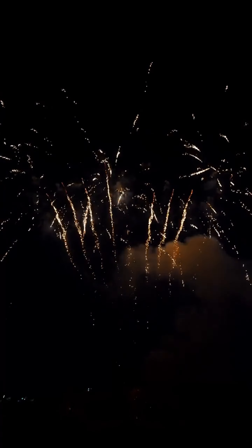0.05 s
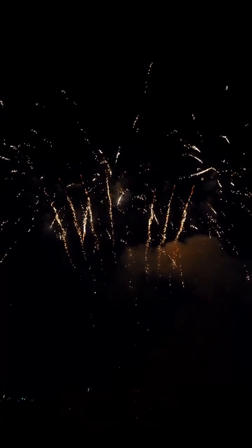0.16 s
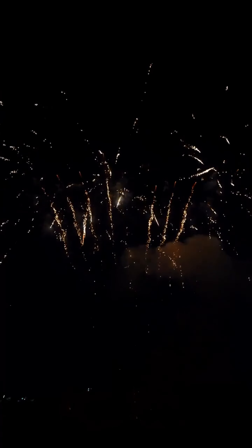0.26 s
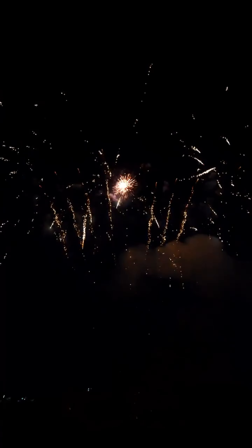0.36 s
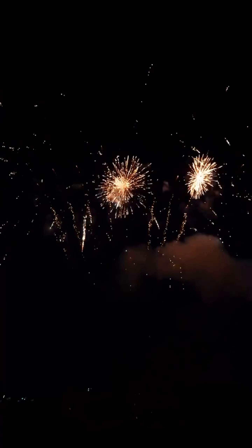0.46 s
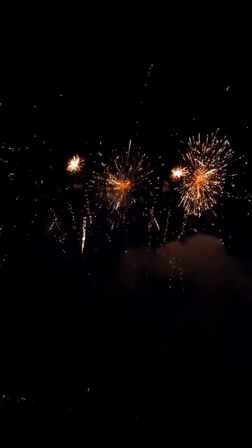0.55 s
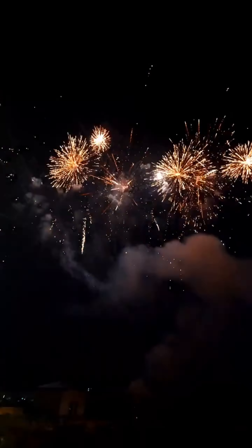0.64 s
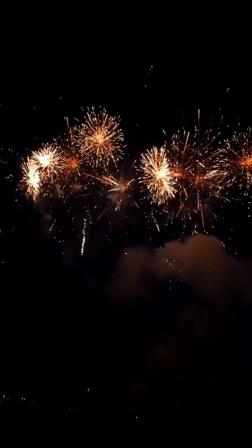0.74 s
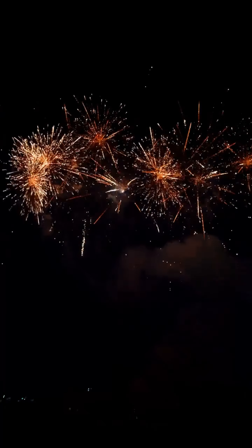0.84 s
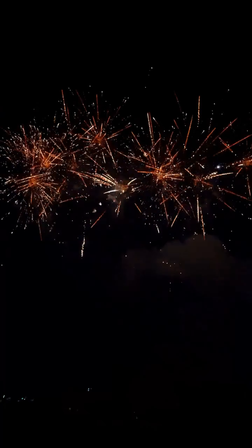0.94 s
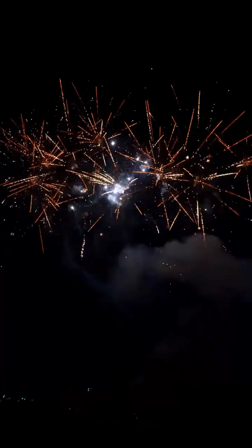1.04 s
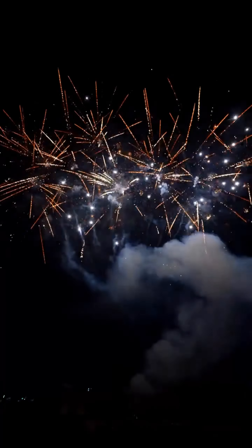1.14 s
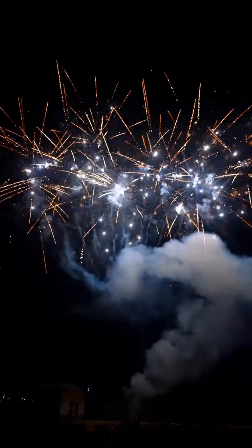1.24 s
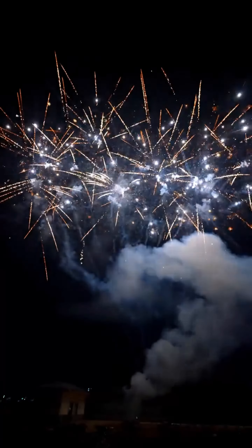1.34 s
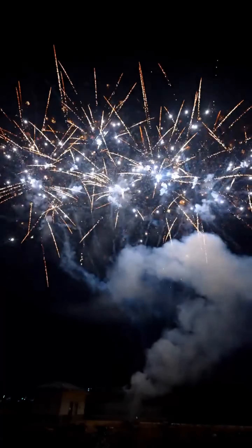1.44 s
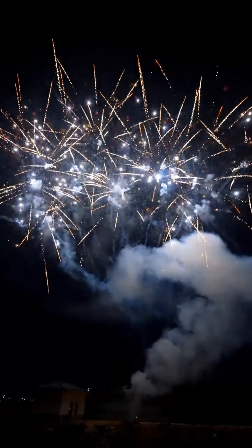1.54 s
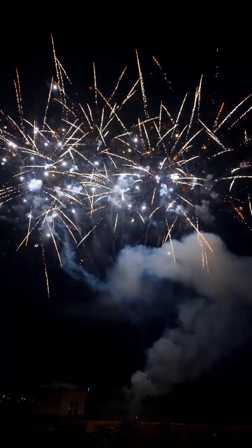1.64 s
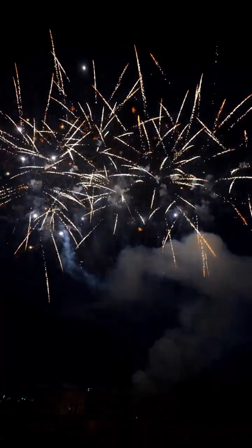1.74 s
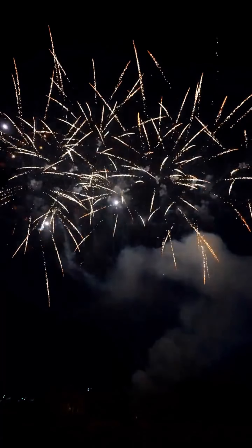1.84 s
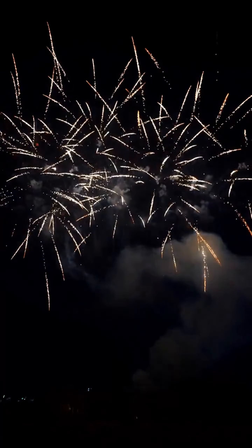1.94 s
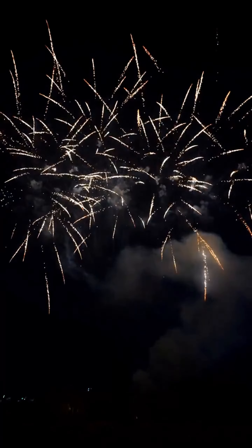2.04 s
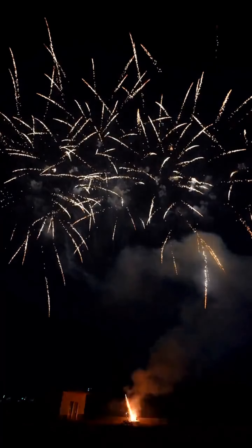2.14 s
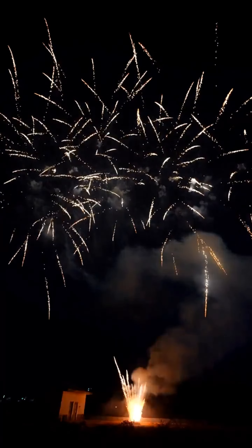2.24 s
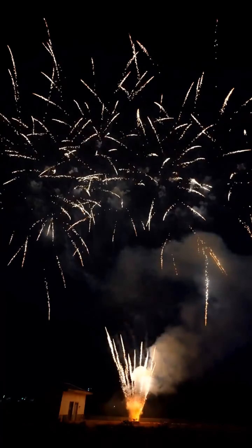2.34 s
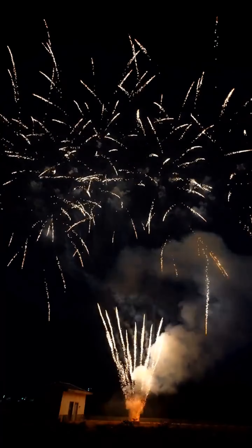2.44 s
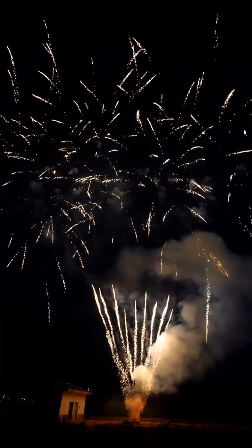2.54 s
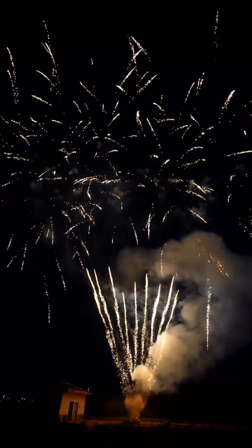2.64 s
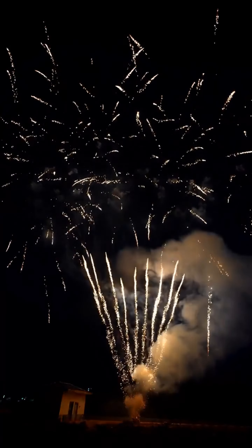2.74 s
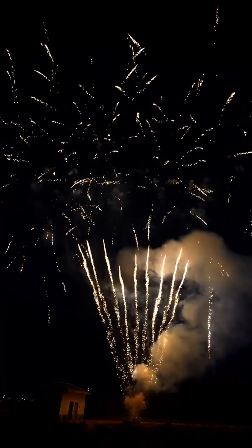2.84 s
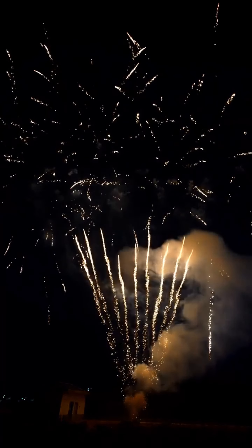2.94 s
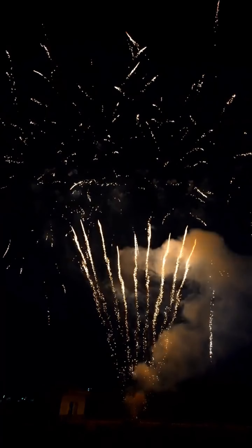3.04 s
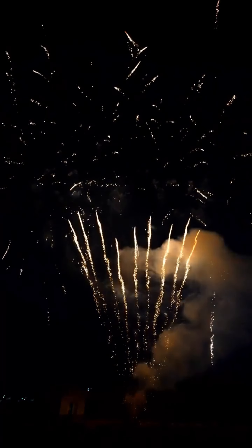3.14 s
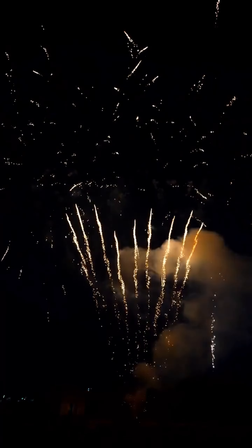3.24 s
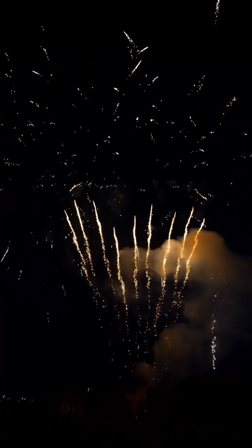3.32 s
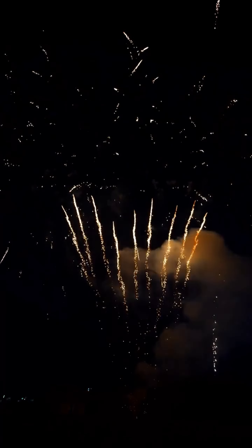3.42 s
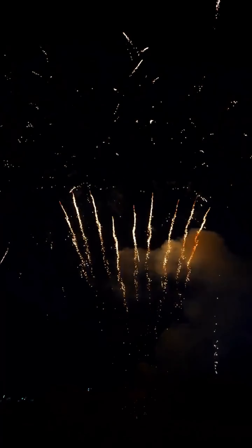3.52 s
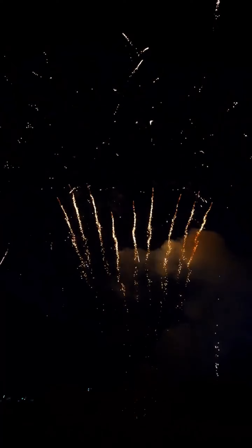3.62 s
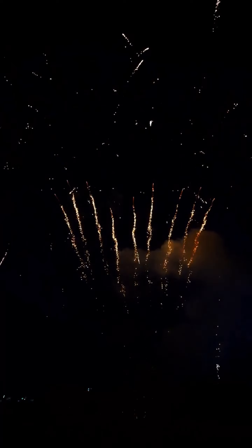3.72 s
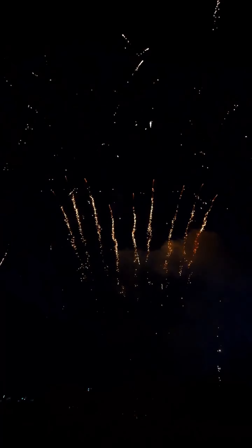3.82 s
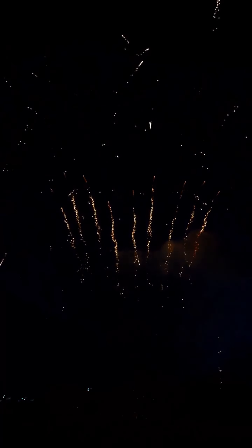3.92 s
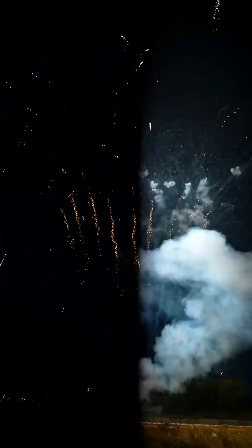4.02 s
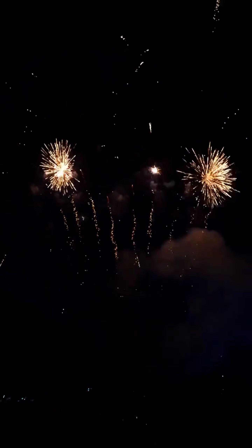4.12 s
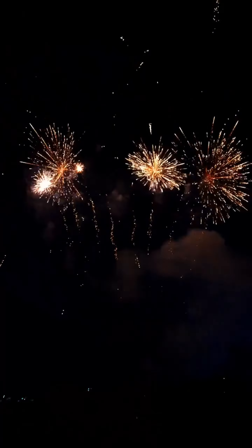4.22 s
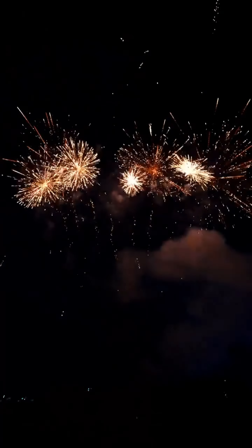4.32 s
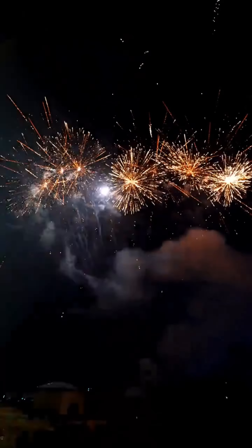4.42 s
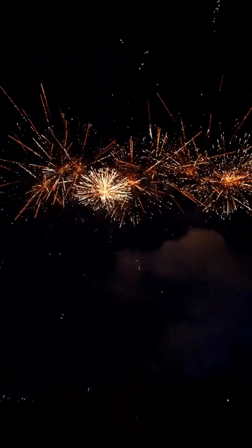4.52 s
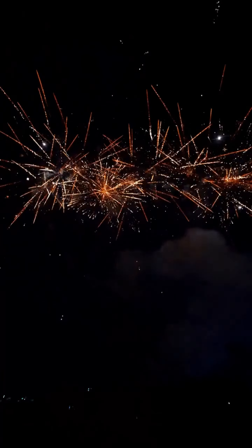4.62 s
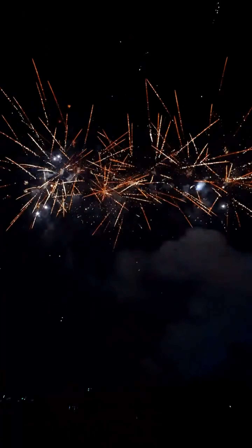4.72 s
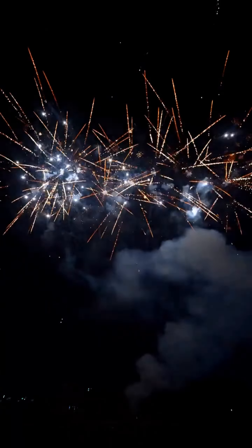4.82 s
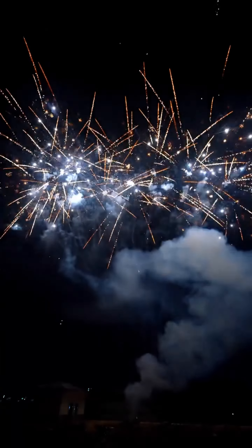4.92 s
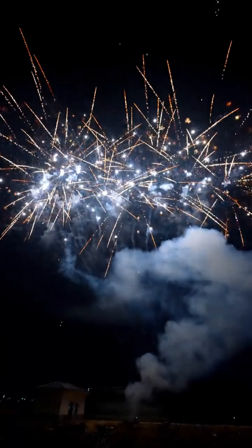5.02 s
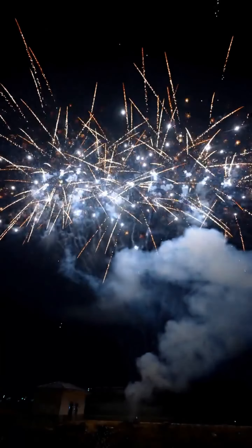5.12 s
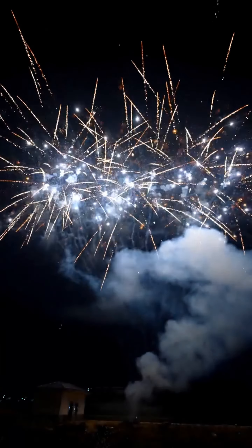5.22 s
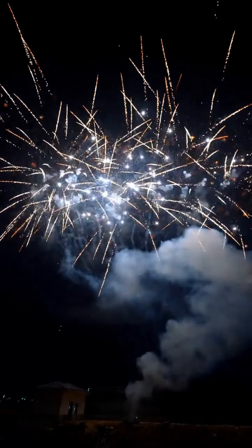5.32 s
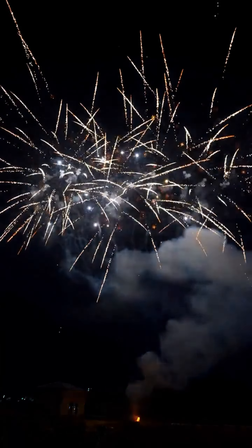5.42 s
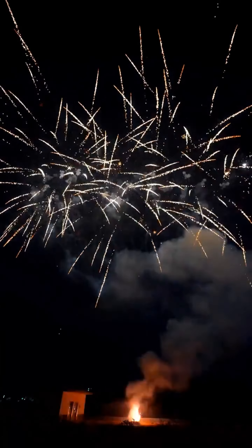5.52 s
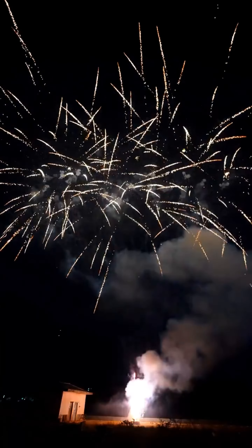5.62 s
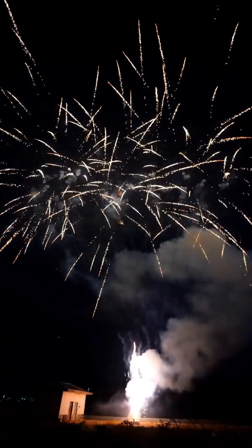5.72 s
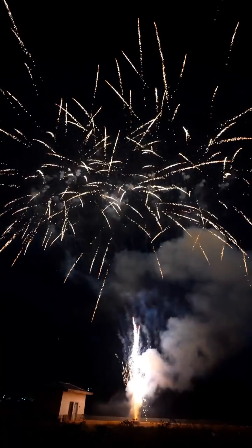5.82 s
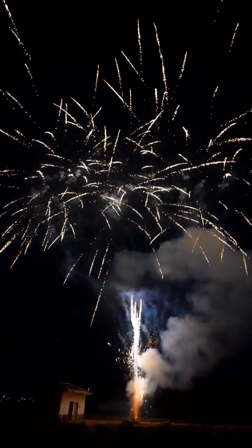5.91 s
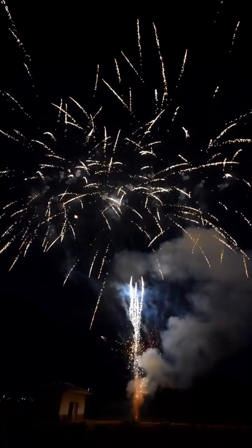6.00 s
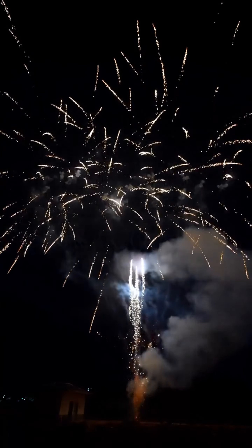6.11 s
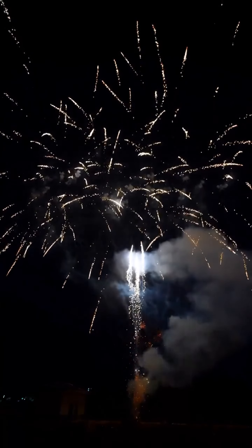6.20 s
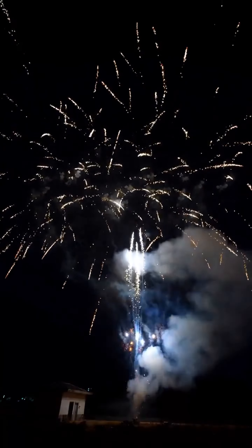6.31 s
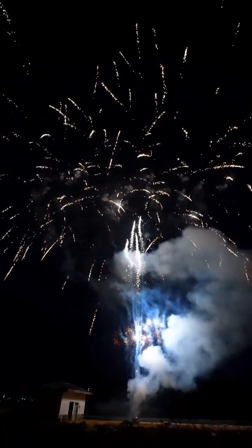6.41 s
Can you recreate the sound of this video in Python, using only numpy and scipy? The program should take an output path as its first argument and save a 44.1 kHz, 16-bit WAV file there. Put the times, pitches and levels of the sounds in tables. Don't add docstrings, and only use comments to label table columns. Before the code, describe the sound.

A night field with low rolling echo from earlier blasts and a thin high insect shimmer. From 0.54 to 1.05 s about two dozen shells burst overhead in ragged succession, hard cracks with deep punch and a ground bounce milliseconds later, peaks softly squashed. Boom and bright splash decay while dense crackle swells from 1.1 s, fullest around 1.6-1.9, thinning to loose sharp pops by 2.25. Lift charges thump rapidly at 2.27-2.53 s, low with a short crack. Echoes fade into a lull, the background slowly returning; faint far thuds at 3.5, 4.0 and 4.15. A second volley hits from 4.27 to 4.76 s, then crackle grows from 4.9, dense until 5.6, gone by 5.95. More thumps run 5.65-5.96. A brief thin squeal near 5.75 joins hissing rockets and a rough, fluttering whistle, falling from about 1150 to 1000 Hz until the end near 6.45. Phone stereo, wide crackle.

```python
import sys
import numpy as np
from scipy import signal
from scipy.fft import rfft, irfft, next_fast_len
from scipy.io import wavfile
from scipy.ndimage import uniform_filter1d, map_coordinates

SR = 44100
rng = np.random.default_rng(int(sys.argv[2]) if len(sys.argv) > 2 else 0)


def ratio(d):
    e = np.asarray(d, float) / 20
    return 10 ** e


def transcribe(u):
    v = np.clip(np.atleast_2d(u).T, -1, 1)
    q = np.round(v * 32767).astype(np.int16)
    wavfile.write(sys.argv[1], SR, q)


N = 284886


def unit(x):
    return x / np.sqrt(np.mean(x ** 2) + 1e-20)


def along(points, hz):
    f, v = np.transpose(points)
    return np.interp(np.log(hz + 1), np.log(f + 1), v)


def curves(rows):
    s, *cols = np.transpose(rows)
    return [np.interp(np.arange(N) / SR, s, c) for c in cols]


def sounding(spans, fade_s):
    t = np.arange(N) / SR
    gates = []
    for rows in spans:
        inside = np.minimum((t - rows[0][0]) / fade_s[0], (rows[-1][0] - t) / fade_s[1])
        gates.append(np.clip(1 + inside, 0, 1))
    return sum(gates)


def wobble(rate_hz, count=N):
    knots = rng.standard_normal(int(count * rate_hz / SR) + 4)
    return unit(map_coordinates(knots, [np.arange(count) * rate_hz / SR]))


def filtered(x, response):
    m = next_fast_len(N + SR // 2)
    return irfft(rfft(x, m) * response(np.fft.rfftfreq(m, 1 / SR)), m)[..., :N]


def coloured(x, spectrum):
    return filtered(x, lambda hz: ratio(along(spectrum, hz)))


# f/Hz, correlation/1
PORT_LIKENESS = [(130, 1), (290, 1), (640, 0.89), (1400, 0.64), (3100, 0.23), (15000, 0.19)]


def rush(spectrum, lumpy_db, rate_hz):
    hz = np.fft.rfftfreq(N, 1 / SR)
    noise = rng.standard_normal((2, N)) * ratio(lumpy_db * wobble(rate_hz))
    a, b = rfft(noise) * ratio(along(spectrum, hz))
    turn = np.arccos(np.clip(along(PORT_LIKENESS, hz), -1, 1)) / 2
    ports = np.array([[1], [-1]])
    late = np.exp(-2j * np.pi * hz / SR * 2.3 * ports)
    return unit(irfft((np.cos(turn) * a + ports * np.sin(turn) * b) * late, N))


def blast(push_ms, swing_hz, damping, dull_hz):
    def response(hz):
        s = 1j * hz / swing_hz
        u = 2j * np.pi * hz * push_ms / 1000
        push = -u / (1 + u) ** 2 * push_ms * SR / 1000
        swing = s * s / (1 + damping * s + s * s)
        return push * swing / (1 + 1j * hz / dull_hz)
    return response


def arrivals(s, db, pan_db, lead):
    at = np.round(np.asarray(s) * SR + np.array([[-.5], [.5]]) * lead).astype(int)
    size = ratio(db + np.array([[.5], [-.5]]) * pan_db) * np.ones(at.shape)
    return np.array([np.bincount(np.clip(a, 0, N - 1), g, N) for a, g in zip(at, size)])


def sputter(hits, t60_s):
    t = np.arange(SR // 10) / SR
    decay = ratio(-60 * t / t60_s)[None]
    return signal.fftconvolve(hits, decay, axes=1)[:, :N] * rng.standard_normal((2, N))


# t/s, level/dB, bounce delay/ms, bounce level/dB
VOLLEYS = [(0.5435, -1.5, 6.7, 1), (0.579, -8, 8.8, -8), (0.6262, -0.5, 6.7, -1.5),
           (0.667, 0.5, 7.5, -7), (0.7, -3.5, 6.1, -10), (0.753, 1.5, 6.5, -1), (0.7563, -2, 4.8, -12),
           (0.7665, -2.5, 8.6, 2.5), (0.7826, -15, 7.5, 2), (0.7962, -15.5, 6.9, 16),
           (0.7997, -7, 7.5, -15), (0.8448, -4, 10, -1), (0.8495, -6.5, 7, 9.5),
           (0.8804, -12, 7.2, 15), (0.8957, -8.5, 8.7, 8), (0.9206, -6, 6.6, 3), (0.9429, -1, 7.5, -2),
           (0.9486, -5, 6.3, -15), (0.9496, -3, 8.3, -7), (0.9795, -3.5, 5, -8),
           (0.9958, -0.5, 6.9, -3), (1.0198, -6, 5.6, 7), (1.055, -23, 7.1, -5),
           (4.2681, -1.5, 6.8, -2), (4.2699, -8.5, 6.2, 3), (4.3, -5.5, 6.2, 1), (4.325, -11, 5.4, 3),
                 (4.3254, -5.5, 9.2, 2), (4.3403, -3.5, 6.8, 5), (4.377, -4, 7.4, -3),
                 (4.4004, -1.5, 6.15, -1), (4.4248, -7, 7.5, 10), (4.4468, -10, 6.5, 10.5),
                 (4.4698, -12, 5.1, 7), (4.4832, 0, 8, -2), (4.4984, -6, 6.4, 4.5), (4.5322, -2, 5.4, -11),
                 (4.5622, -6, 5.3, 3), (4.5773, -3.7, 6.5, 6), (4.6049, -4, 7.2, -9),
                 (4.6283, -1.5, 6.6, 4), (4.661, -19, 6.5, 2), (4.721, -3.5, 5.5, 1.5),
                 (4.7279, -4.5, 6.6, 1), (4.7433, -14.5, 5.1, 11), (4.76, -16, 9, 3)]
BURSTS = VOLLEYS
# f/Hz, level/dB
FIZZ = [(530, -29), (900, -1.5), (1130, -7.5), (1900, -2.5), (3820, -8.5), (7310, -9.5), (14400, -20),
        (16000, -25)]


def shells():
    s, db, delay_ms, bounce_db = np.transpose(BURSTS)
    direct = arrivals(s, db, pan_db=-4.5, lead=-0.5)
    bounce = arrivals(s + delay_ms / 1000, db + bounce_db, pan_db=6, lead=9)
    crack = coloured(sputter(direct + bounce, t60_s=0.015), FIZZ)
    body = ratio(7.5) * filtered(direct, blast(push_ms=.37, swing_hz=170, damping=.3, dull_hz=430))
    body += ratio(-1) * filtered(bounce, blast(push_ms=2.2, swing_hz=300, damping=.55, dull_hz=370))
    snap = filtered(direct, blast(push_ms=.12, swing_hz=900, damping=1.2, dull_hz=6000))
    return body + ratio(-2.5) * snap + ratio(-8.0) * crack


# f/Hz, level/dB
POP = [(180, -34), (300, -6.5), (502, -11), (701, -9.5), (885, -8.5), (1170, -3), (1640, 1), (6100, -4.5),
       (7320, -6.5), (8220, -12), (13100, -17.5), (15200, -25.5), (16000, -46)]


def pop_colour(hz):
    return ratio(along(POP, hz)) * np.exp(-1j * np.arctan(5000 / (hz + 1)))


# t/s, level/dB
CRACKLE = [
    [(1.1, -66), (1.19, -32), (1.322, -22), (1.62, -18), (1.942, -19.5), (2.07, -26), (2.17, -32),
     (2.26, -40.5)],
    [(4.8, -34.5), (4.92, -31.5), (4.99, -22), (5.154, -18.5), (5.542, -18), (5.74, -26), (5.95, -44)],
]
# t/s, peak level/dB, left-right/dB
STRAYS = [(2.0002, -15.5, -12), (2.0565, -1, 15), (2.0659, -7, 16), (2.1258, -3, 6), (2.1366, -2, -2.5),
          (2.1396, -13, -3), (2.157, -13, -7), (2.1936, -7.5, 3), (2.215, -15, -10), (2.2493, -35, 31)]


def crackle():
    level_db = curves(np.concatenate(CRACKLE))[0]
    rate_hz = 12000 * ratio(2 * (level_db - level_db.max())) + 150
    chance, size, side = rng.random(N), rng.standard_normal(N), rng.uniform(-1, 1, N)
    at = np.flatnonzero(chance < rate_hz / SR)
    pops = arrivals(at / SR, 4.1 * size[at], 5 * side[at] - 1.5, 8 * side[at] - 3) / np.sqrt(rate_hz)
    pops = unit(pops - uniform_filter1d(pops, size=64))
    pops = pops + 0.87 * rush([(20, 0.0061), (20000, 0)], lumpy_db=2.5, rate_hz=60)
    shower = unit(filtered(pops, pop_colour)) * ratio(level_db + 2.5) * sounding(CRACKLE, (.1, .05))
    s, db, pan_db = np.transpose(STRAYS)
    return shower - ratio(10.0) * filtered(arrivals(s, db, pan_db, lead=pan_db), pop_colour)


# t/s, level/dB
LIFTS = [(2.2664, 0.5), (2.288, -9), (2.3032, -1), (2.3163, 1.5), (2.33, 5), (2.3397, -2), (2.35, -2.5),
         (2.3647, -3.5), (2.3739, 1), (2.4073, -5.6), (2.421, -8), (2.4574, -30), (2.4793, -17),
         (2.5255, -14), (5.645, -11), (5.663, -4.5), (5.683, -13), (5.7049, -1.6), (5.725, -14),
         (5.742, -6), (5.7564, -4.5), (5.7741, 0), (5.7891, -4), (5.8082, 1.5), (5.8209, -3), (5.8462, -1),
         (5.8771, -1), (5.911, -5.5), (5.9247, -6), (5.96, -14)]
# f/Hz, level/dB
MUZZLE = [(350, -27), (600, 1), (944, -15), (1210, -6), (1310, -14), (1880, -2.5), (2720, -21),
          (4160, -10.5), (7410, -19), (14100, -26.5), (16000, -39)]
# t/s, level/dB
KNOCKS = [
    (3.48, -28),
    (4.019, -24),
    (4.148, -17.5),
]
SLAP_S, SLAP_DB = 0.00442, -13
CRACK_GROWS = 1.3


def lifts():
    slaps = [(s + SLAP_S, db + SLAP_DB) for s, db in LIFTS]
    s, db = np.transpose(LIFTS + slaps)
    hits = arrivals(s, CRACK_GROWS * db, pan_db=6.7, lead=4.5)
    crack = coloured(sputter(hits, t60_s=0.039), MUZZLE)
    pushes = arrivals(s - .0002, db, 0, 0) + arrivals(*np.transpose(KNOCKS), 0, 0)
    thump = blast(push_ms=4.9, swing_hz=191, damping=0.3, dull_hz=208)
    heave = blast(push_ms=0.94, swing_hz=71.6, damping=0.71, dull_hz=110)
    low = filtered(pushes, lambda hz: ratio(-8.0) * thump(hz) + ratio(-9) * heave(hz))
    return low + ratio(-6.5) * crack


def blurred_tone(turns, rate_hz):
    n = len(turns)
    sine = wobble(rate_hz, n) * np.sin(2 * np.pi * turns)
    return sine + wobble(rate_hz, n) * np.cos(2 * np.pi * turns)


# t/s, f/Hz
PITCH = [(5.7, 1158), (5.95, 1122), (6.2, 1054), (6.46, 992)]
# t/s, level/dB
THROBS = [(5.712, -17.5), (5.734, -17), (5.767, -27), (5.814, -17.5), (5.841, -16.5), (5.864, -11.5),
          (5.896, -15.5), (5.936, -23.5), (5.961, -17.5), (5.996, -13.5), (6.023, -12.5), (6.045, -12),
          (6.069, -14), (6.09, -17.5), (6.115, -15), (6.145, -12), (6.166, -12.5), (6.196, -11),
          (6.217, -12), (6.238, -17), (6.263, -14), (6.283, -19.5), (6.308, -13.5), (6.328, -15),
          (6.355, -13.5), (6.375, -13.5), (6.401, -22), (6.419, -18), (6.447, -22)]
# multiple/1, level/dB
OVERTONES = [(2, -16.5), (3, -11), (4, -20.5), (5, -25), (6, -20.5), (7, -23.5)]
# t/s, level/dB
RASP = [(5.7, -2), (5.95, -4.5), (6.2, -1), (6.46, 5)]
# t/s, f/Hz, level/dB
SQUEAL = [(5.69, 3900, -34), (5.735, 3880, -29), (5.755, 3900, -24), (5.79, 3900, -24), (5.83, 3900, -30),
          (5.92, 3860, -36)]
# t/s, level/dB
THRUST = [(5.8, -26), (5.98, -29), (6.398, -25), (6.46, -21)]
# f/Hz, level/dB
JET = [(760, -21.5), (1300, -10), (2090, -12), (2860, -11), (3240, -5), (8610, -18.5), (13200, -28),
       (16000, -63)]
SWELL_SHARE = 0.3
HALO_DB, HALO_HZ = -9, 130


def whistles():
    lit = round(5.6 * SR)
    t, n = np.arange(lit, N) / SR, N - lit
    turns = np.cumsum(curves(PITCH)[0][lit:]) / SR
    s, db = np.transpose(THROBS)[:, :, None]
    width_s = SWELL_SHARE * np.gradient(s, axis=0)
    swell = np.sqrt(np.sum(ratio(2 * db) * np.exp(-((t - s) / width_s) ** 2), axis=0))
    breath = uniform_filter1d(swell, size=5000) * ratio(curves(RASP)[0][lit:])
    tone = swell * np.sin(2 * np.pi * turns + .65 * wobble(60, n)) * ratio([[2.4], [-2.4]])
    for port, side_db in enumerate((2.4, -2.4)):
        halo = blurred_tone(turns, HALO_HZ)
        tone[port] += ratio(HALO_DB + side_db) * uniform_filter1d(swell, size=1200) * halo
    for k, db in OVERTONES:
        for port, side_db in enumerate((1.8, -1.8)):
            flutter = blurred_tone(k * turns, 50 * k ** 1.5)
            tone[port] += ratio(db + side_db + 2 * wobble(30, n)) * breath * flutter
    hz, db = np.array(curves(SQUEAL))[:, lit:]
    squeal_phase = 2 * np.pi * np.cumsum(hz) / SR + .9 * wobble(400, n)
    squeal = ratio(db - 3 + 3.5 * wobble(70, n)) * np.sin(squeal_phase)
    tone += squeal * sounding([SQUEAL], (.01, .03))[lit:] * ratio([[2.5], [-2.5]])
    hiss = ratio(curves(THRUST)[0]) * sounding([THRUST], (.1, .1)) * rush(JET, lumpy_db=1.5, rate_hz=71)
    return np.pad(tone, ((0, 0), (lit, 0))) + hiss * ratio([[1.2], [-1.2]])


PILE_DB = -20


def lingering(events, stages):
    s, db = np.transpose(events)[:2]
    kicks = np.bincount(np.round(s * SR).astype(int), ratio(2 * db), N)

    def dying(per_s):
        return signal.lfilter([1], [1, -np.exp(-per_s / SR)], kicks)

    power = 0
    for rise_s, t60_s, level_db in stages:
        fall_per_s = 2 * np.log(1000) / t60_s
        power = power + ratio(2 * level_db) * (dying(fall_per_s) - dying(fall_per_s + 1 / rise_s))
    return np.abs(power) / (1 + np.abs(power) / ratio(2 * PILE_DB))


EARLIER_S = -0.98
DUCK_DB, RECOVER_S = -17.5, 0.97


def regained():
    bangs = np.sort([EARLIER_S] + [row[0] for row in BURSTS + LIFTS + STRAYS])
    t = np.arange(N) / SR
    since_s = t - bangs[np.searchsorted(bangs, t, "right") - 1]
    return ratio(DUCK_DB * np.exp(-since_s / RECOVER_S))


# f/Hz, level/dB
BOOM = [(15, -56), (25, -24), (65, -10), (124, -0.5), (214, -3.5), (301, 0), (520, -8.5), (680, -61),
        (1140, -120)]
ROAR = [(260, -41), (450, -11), (754, -1), (994, -6.5), (1400, -5.5), (4900, -24), (7000, -34),
        (9100, -68.5), (15400, -120)]
THUD = [(15, -67), (25, -37), (46, -24.5), (102, -17), (225, -4.5), (351, -7), (398, -9.5), (520, -21.5),
        (680, -44), (1140, -120)]
# rise/s, t60/s, level/dB
SHELL_BOOM = [(.015, 0.86, -21.5), (.05, 2.17, -28.5)]
SHELL_ROAR = [(.002, 0.049, -9.5), (.02, 0.53, -22.5), (.1, 4, -33.5)]
SHELL_SPLASH = [(.001, 0.09, -25.5), (0.011, 0.89, -21.5)]
SHELL_THUD = [(.2, 11.5, -44.5)]
# rise/s, t60/s, level/dB
LIFT_BOOM = [(.01, 0.34, -33.5), (.05, 2.46, -43.5), (.1, 9, -60)]
LIFT_ROAR = [(.002, 0.044, -39), (.02, 0.31, -36), (.1, 6, -50)]
LIFT_SPLASH = [(.001, 0.074, -45), (.02, 0.52, -29), (0.098, 3, -56.5)]
EARLIER_BOOM_DB, EARLIER_ROAR_DB, EARLIER_T60_S = -44, -44.5, 17
FAR_BOOM_DB, FAR_ROAR_DB = -44, -50.5
STARS_ROAR_DB, JET_ROAR_DB, JET_BOOM_DB = -15.5, -13, -17.5
TAIL_HZ = 9700


def echoes():
    earlier = ratio(-120 * np.arange(N) / SR / EARLIER_T60_S) * (np.arange(N) < BURSTS[0][0] * SR)
    night = regained() ** 2
    stars = ratio(2 * curves(np.concatenate(CRACKLE))[0]) * sounding(CRACKLE, (.1, .05))
    jets = ratio(2 * curves(THRUST)[0]) * sounding([THRUST], (.1, .1))
    thud = lingering(LIFTS, LIFT_BOOM) + lingering(BURSTS, SHELL_THUD)
    thud += ratio(2 * EARLIER_BOOM_DB) * earlier + ratio(2 * FAR_BOOM_DB) * night
    thud += ratio(2 * JET_BOOM_DB) * jets
    roar = lingering(BURSTS, SHELL_ROAR) + lingering(LIFTS, LIFT_ROAR)
    roar += ratio(2 * EARLIER_ROAR_DB) * earlier + ratio(2 * FAR_ROAR_DB) * night
    roar += ratio(2 * STARS_ROAR_DB) * stars + ratio(2 * JET_ROAR_DB) * jets
    splash = rush(FIZZ, lumpy_db=1.0, rate_hz=98)
    low_splash = np.sqrt(lingering(LIFTS, LIFT_SPLASH)) * splash[:, ::-1]
    out = filtered(low_splash, lambda hz: 1 / (1 + (hz / TAIL_HZ) ** 4))
    out += np.sqrt(lingering(BURSTS, SHELL_SPLASH)) * splash
    out += np.sqrt(lingering(BURSTS, SHELL_BOOM)) * rush(BOOM, lumpy_db=2.0, rate_hz=45)
    out += np.sqrt(thud) * rush(THUD, lumpy_db=1.5, rate_hz=50)
    return out + np.sqrt(roar) * rush(ROAR, lumpy_db=1.5, rate_hz=78)


# f/Hz, level/dB
INSECTS = [(3240, -41), (5500, -29), (7310, -4), (8500, 4.5), (10900, -8.5), (12100, -16), (13000, -32)]
CHORUS_DB = -51


def insects():
    return ratio(CHORUS_DB) * regained() * rush(INSECTS, lumpy_db=.4, rate_hz=30)


def scene():
    return shells() + crackle() + lifts() + whistles() + echoes() + insects()


def low_pass(x):
    return signal.sosfilt(signal.butter(12, 16480, fs=SR, output="sos"), x)


def record(dry):
    bent = dry / (1 + np.abs(dry / .97) ** 6) ** (1 / 6)
    mix = filtered(bent, lambda hz: hz < 15950)
    return low_pass(mix)


dry = scene()
out = record(dry)
transcribe(out)
```